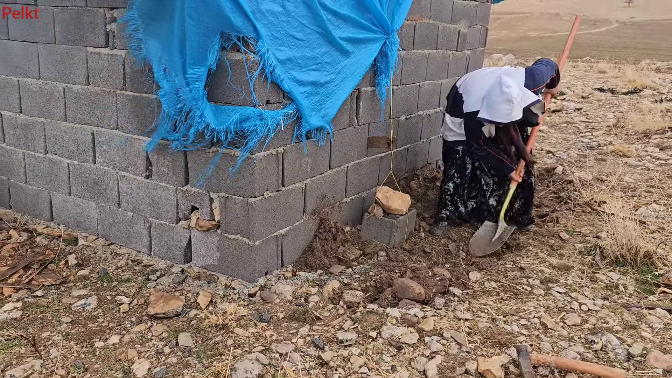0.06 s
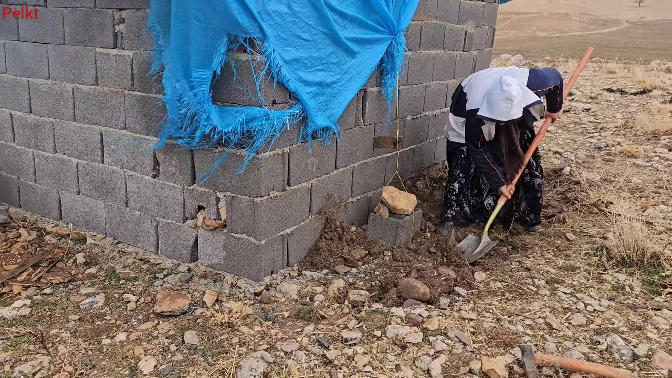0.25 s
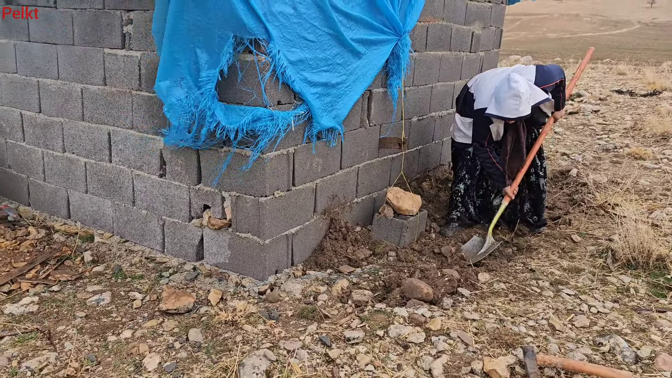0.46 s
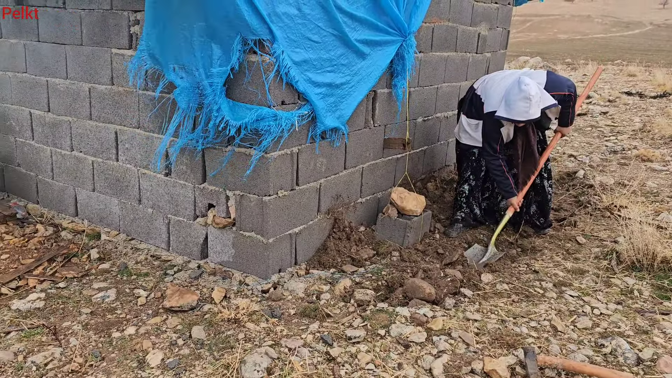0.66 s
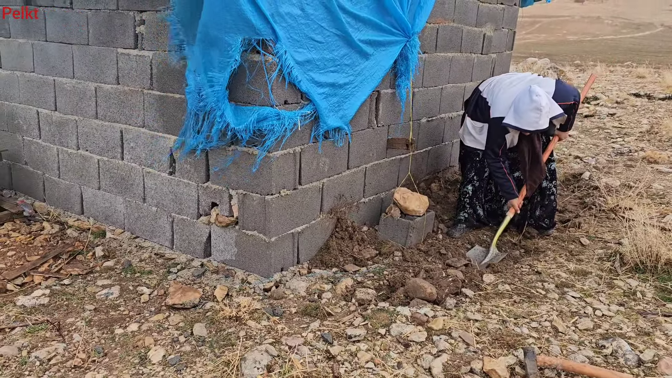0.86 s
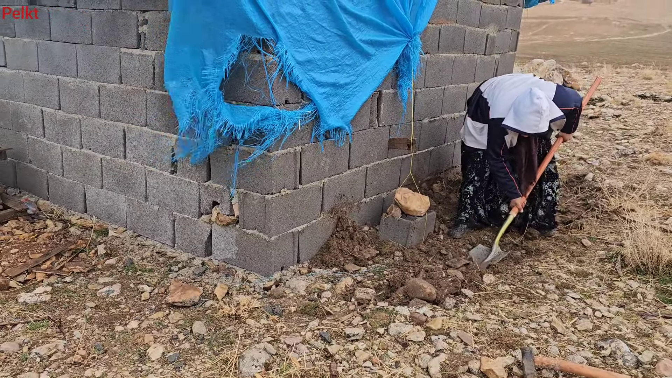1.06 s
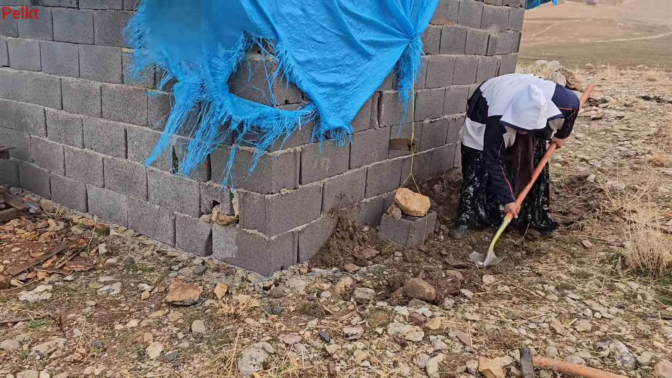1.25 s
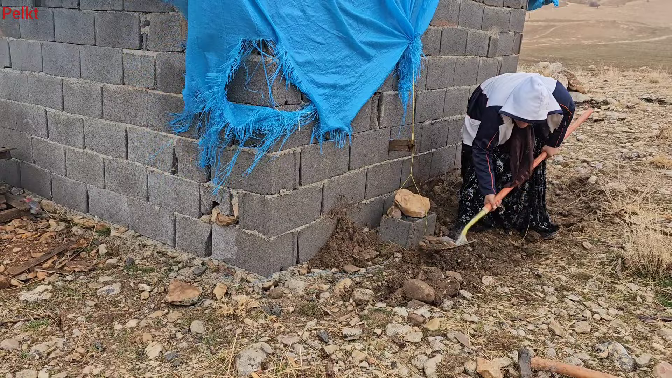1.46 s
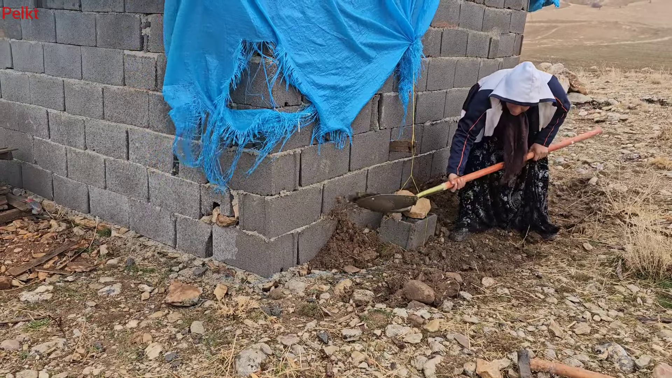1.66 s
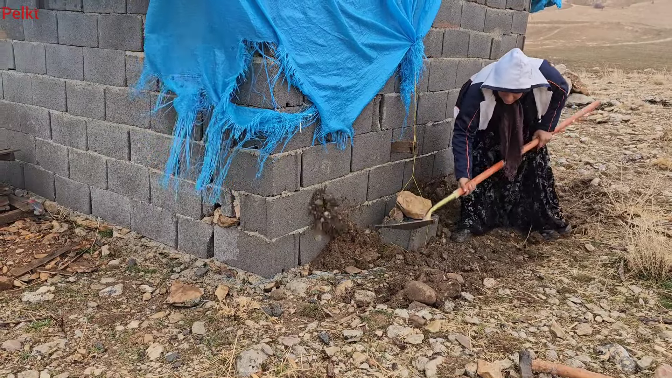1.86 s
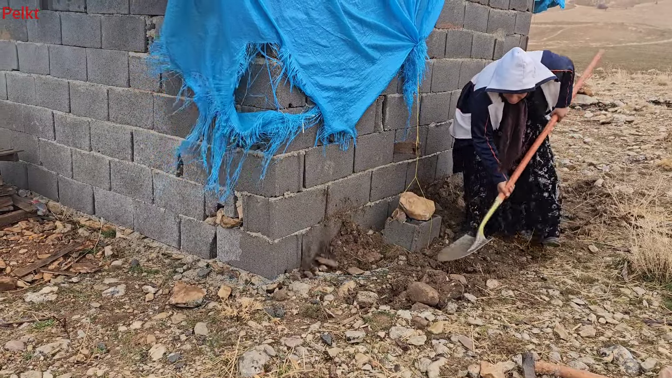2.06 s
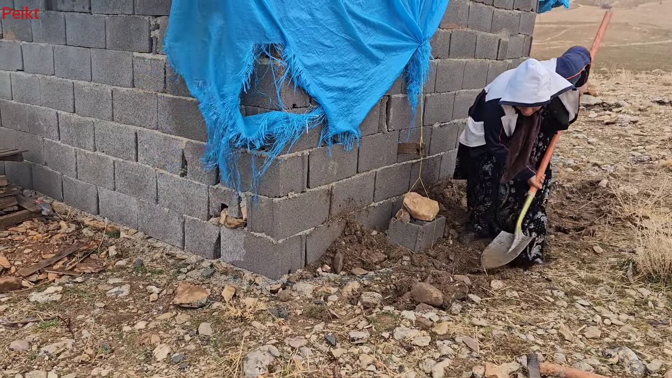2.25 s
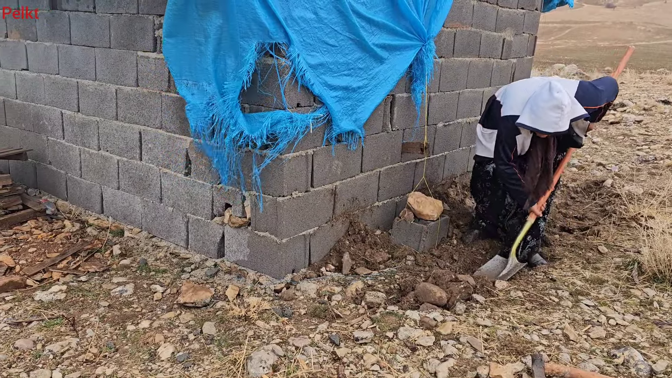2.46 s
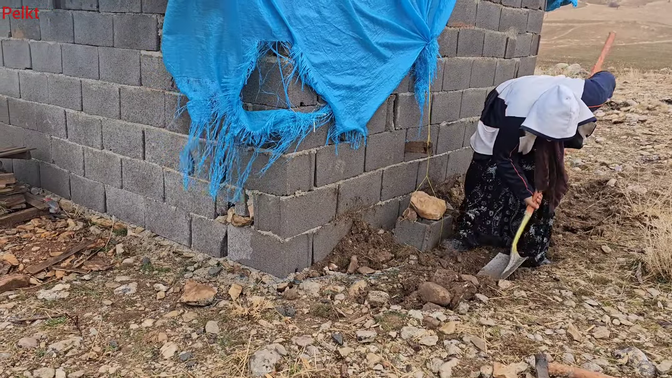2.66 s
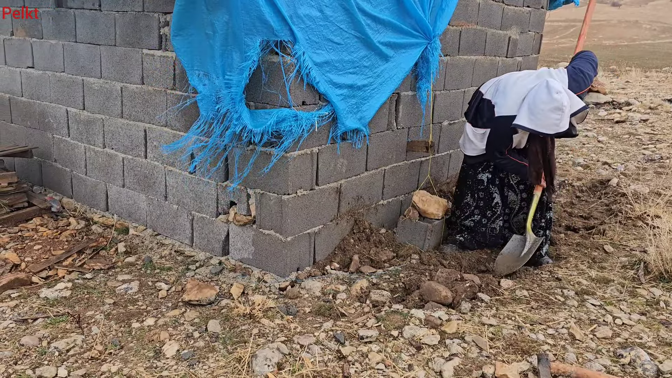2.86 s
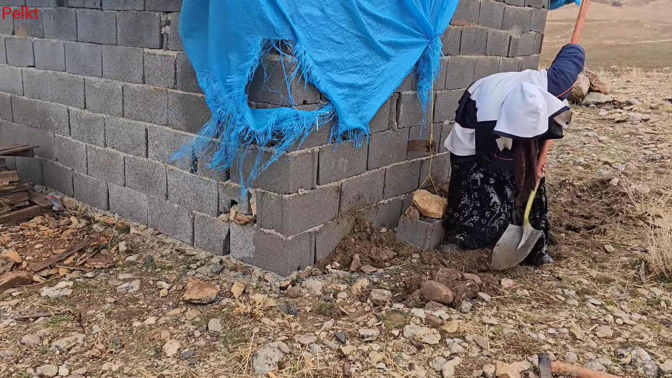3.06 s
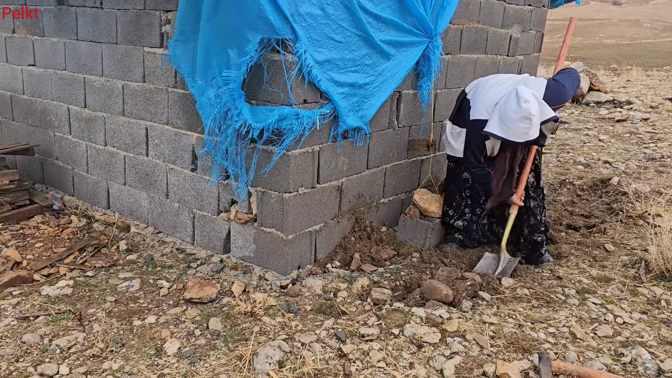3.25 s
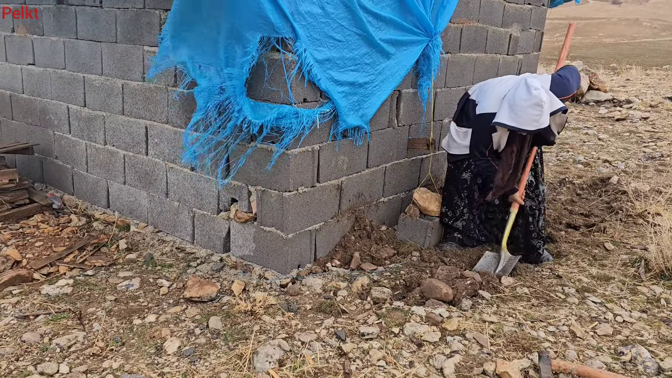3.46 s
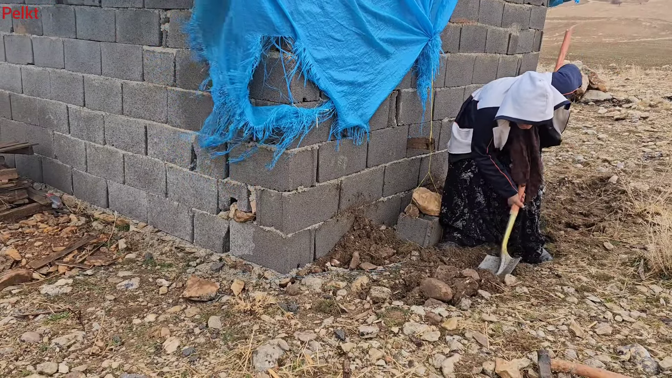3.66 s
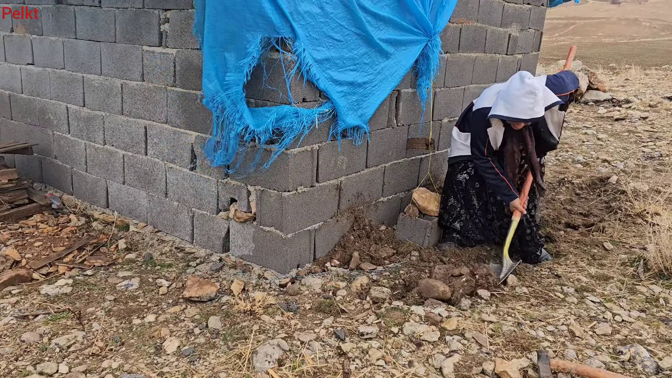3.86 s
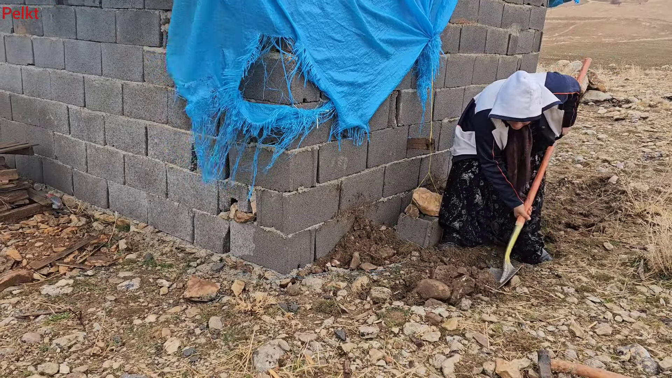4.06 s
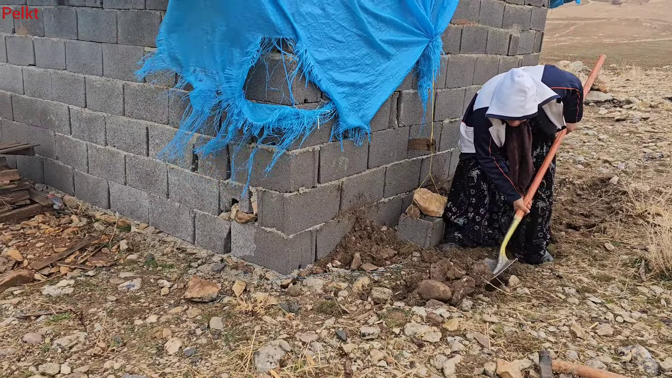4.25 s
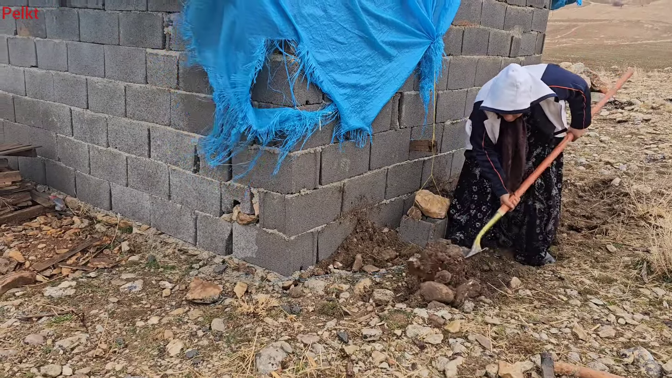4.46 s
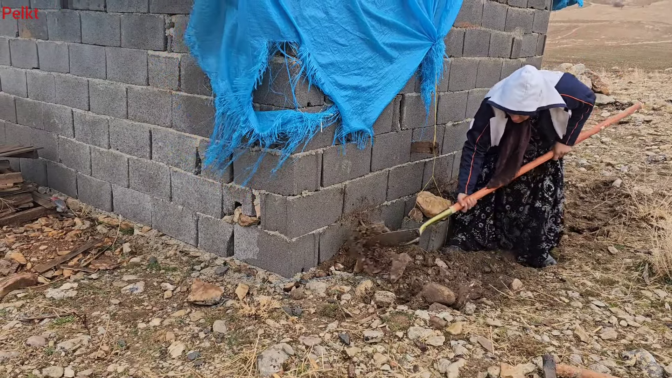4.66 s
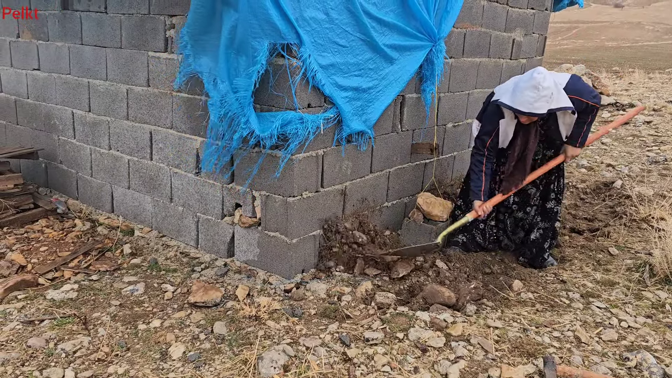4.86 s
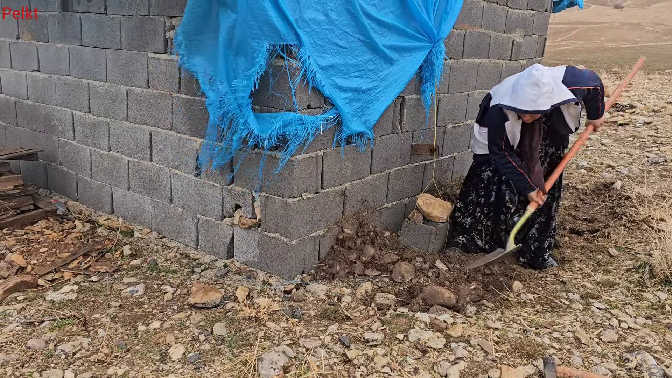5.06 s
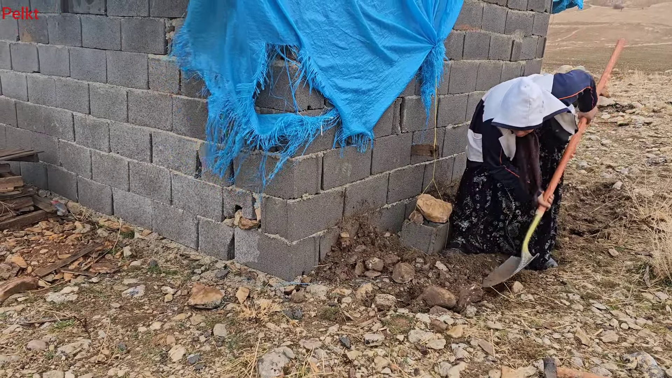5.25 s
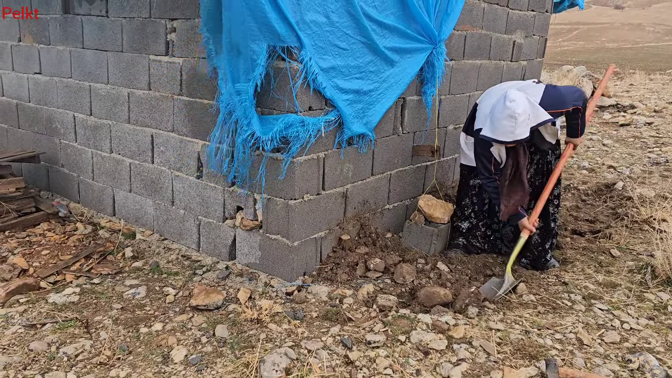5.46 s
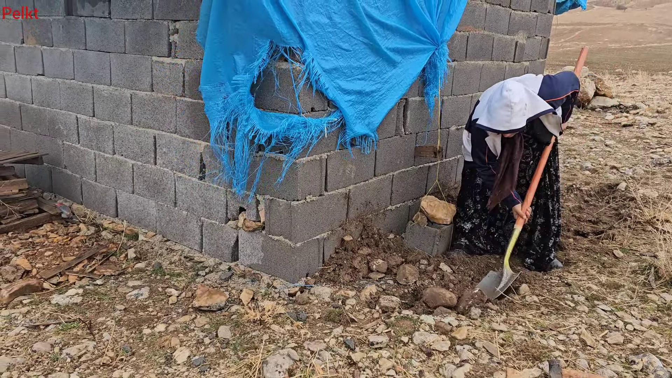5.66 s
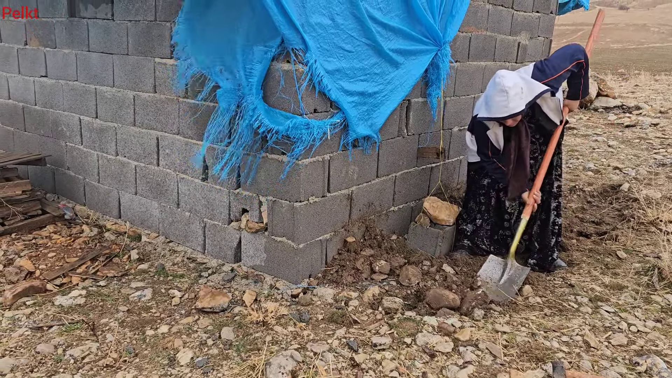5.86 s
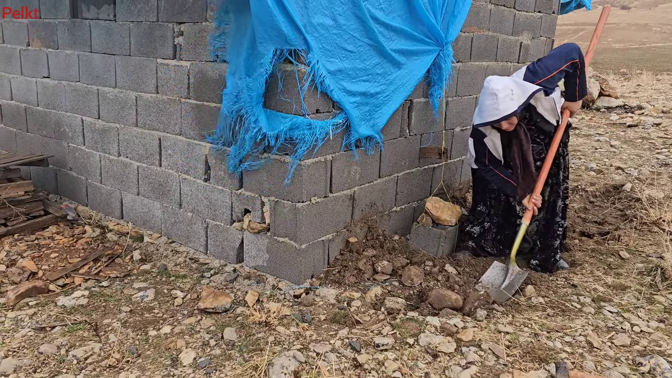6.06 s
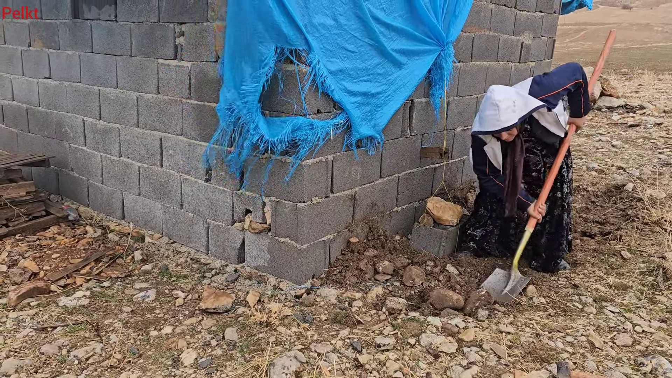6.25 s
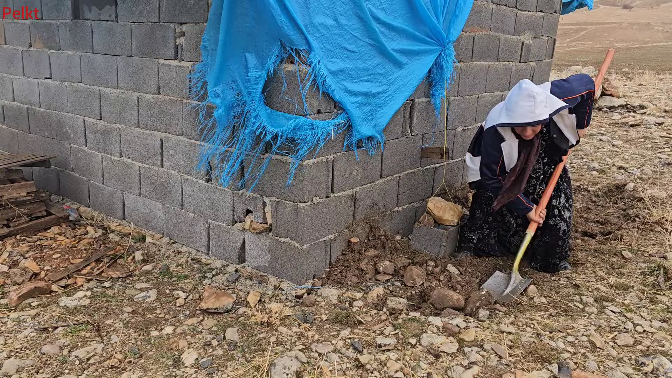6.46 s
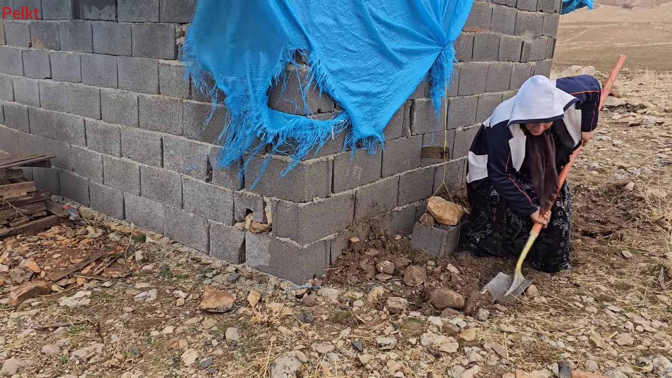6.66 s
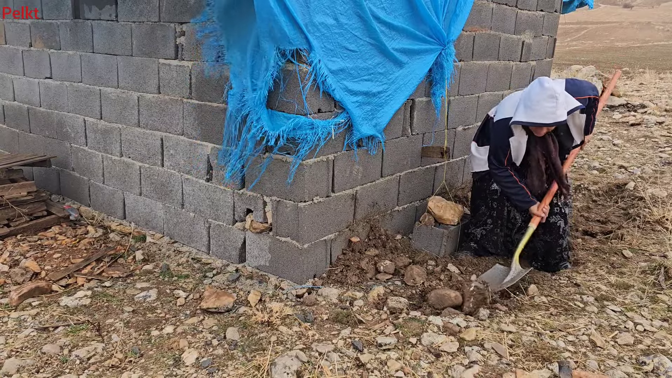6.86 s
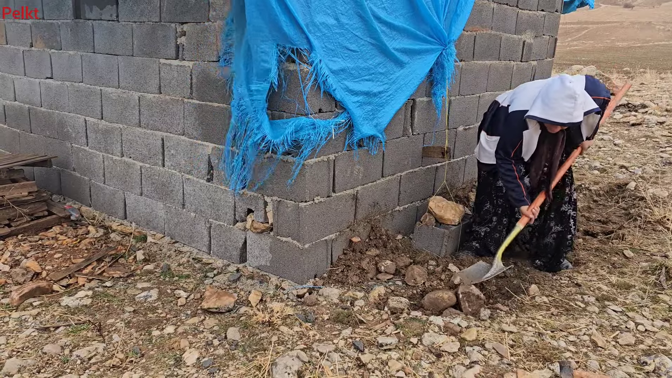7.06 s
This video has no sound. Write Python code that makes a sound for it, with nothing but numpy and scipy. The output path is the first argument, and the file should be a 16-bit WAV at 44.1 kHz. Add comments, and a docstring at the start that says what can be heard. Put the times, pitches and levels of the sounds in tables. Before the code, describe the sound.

Outdoors in a light breeze, a shovel blade crunches into gravelly dirt, grates under stones, and tosses loose soil with clattering pebbles.

```python
"""Light wind rumbles on two microphone ports over a faint outdoor hiss, a short clack, then a steel shovel digs in.
A few metres away, beside a block wall, the blade is stabbed into stony soil five times and worked under the stones.
Contacts are showers of random fractures plus decaying modes of shaft and blade; scrapes, squeals and falling
soil are swelling streams of grains; stones, and part of some blade blows, are short coloured bursts.
Wind and hiss are shaped noise. Ground and wall answer with diffuse returns."""
import sys
import numpy as np
from scipy import signal
from scipy.fft import rfft, irfft
from scipy.io import wavfile
from scipy.ndimage import uniform_filter1d

SR = 44100
rng = np.random.default_rng(int(sys.argv[2]) if len(sys.argv) > 2 else 0)


def master(y):
    """Save y as 16-bit WAV."""
    cut = np.clip(np.atleast_2d(y).T, -1, 1)
    pcm = np.round(cut * 32767)  # scale
    wavfile.write(sys.argv[1], SR, pcm.astype(np.int16))


N = 313110
TIME = np.arange(N) / SR  # the whole scene [s]
AGE = np.arange(SR // 2) / SR  # time since one sound began [s]
BINS = np.fft.rfftfreq(4096, 1 / SR)  # frequencies of every colour [Hz]

# the blade slides through grit: (start [s], peak [s], end [s], level [dB], tilt [dB per octave])
SCRAPES = [(0.172, 0.189, 0.28, -32, 1), (0.199, 0.25, 0.42, -48.5, -0.5), (0.549, 0.66, 0.75, -47.5, 0),
           (1.131, 1.23, 1.35, -42, -1.5), (1.298, 1.365, 1.417, -38, -1.5),
           (2.394, 2.437, 2.71, -55.5, -2.5), (3.44, 3.615, 3.84, -48.5, -3),
           (3.762, 3.822, 3.876, -42, -1), (3.87, 3.89, 3.995, -42.5, -1), (4.235, 4.31, 4.45, -42.5, -1),
           (4.339, 4.411, 4.465, -44, -2.5), (5.079, 5.237, 5.33, -55, 5.5), (5.648, 5.714, 5.8, -48.5, -1),
           (5.779, 5.82, 6.2, -47.5, 0.5), (6.101, 6.13, 6.25, -44.5, 1.5), (6.401, 6.517, 6.7, -58.5, -1),
           (6.744, 6.82, 7.3, -50, -5)]
# loose soil is thrown on the heap: (start [s], peak [s], end [s], level [dB])
SPILLS = [(1.75, 1.81, 2.06, -54), (1.969, 2.06, 2.26, -50.5), (4.66, 4.804, 4.9, -49.5),
          (4.88, 4.986, 5.23, -63)]
# modes of the steel blade: (frequency [Hz], t60 when free [s], struck at the tip [dB], struck on the side [dB])
BLADE = [(1050, 0.14, -20, -9), (1155, 0.042, -1, -28.5), (1427, 0.078, -3.5, -0.5),
         (1476, 0.2, -7.5, -9.5), (1639, 0.14, 0, -23.5), (1850, 0.13, -4.5, -18.5), (2005, 0.23, 5, -30.5),
         (2050, 0.15, -26.5, 5.5), (2285, 0.22, -12, -4), (2483, 0.22, -4.5, -25.5), (2970, 0.09, -4.5, 7),
         (3050, 0.059, -2.5, -14.5), (3350, 0.066, -3, -9), (3300, 0.059, -15, 4),
         (3500, .08, -18.5, -18.5), (4590, 0.063, -20, -2.5)]


def amp(db):
    """Decibels to gain."""
    return 10 ** (np.asarray(db) / 20)


def unit(x):
    """Scales to rms 1."""
    return x / np.sqrt(np.mean(x ** 2) + 1e-20)


def read(points, hz):
    """A spectrum joined by straight lines over log frequency."""
    f, value = np.transpose(points)
    return np.interp(np.log(hz + 1), np.log(f + 1), value)


def follow(points, t):
    """A control curve at the times t."""
    return np.interp(t, *np.transpose(points))


def add(mix, s, sound):
    """Mixes a sound in at s seconds."""
    part = mix[max(round(s * SR), 0):][:len(sound)]
    part += sound[:len(part)]


def dying(t60):
    """An exponential decay by 60 dB in t60 seconds."""
    return 10 ** (-3 * AGE / max(t60, 1e-3))


def onset(rise_s):
    """A smooth start: contact through soil takes a moment to build."""
    return 1 - np.exp(-(AGE / rise_s) ** 2)


def colour(x, db):
    """Filters causally, with minimum phase, by a gain given at BINS."""
    cepstrum = irfft(np.log(amp(db)))
    # folding the cepstrum forward in time makes the filter causal
    cepstrum[1:2048] *= 2
    cepstrum[2049:] = 0
    response = irfft(np.exp(rfft(cepstrum)))
    return signal.fftconvolve(x, response)[:len(x)]


def ripple(width_bins):
    """Random peaks and dips of rms 1 over BINS: every stone and every grip on the blade rings differently."""
    smooth = uniform_filter1d(rng.standard_normal(len(BINS)), width_bins)
    return unit(uniform_filter1d(smooth, width_bins))


def grains(size, per_s, spread_db):
    """Tiny random fractures, most small and a few large."""
    chance, height, sign = rng.random((3, size))
    height = np.minimum(-np.log(1 - height), 4)
    happens = chance < per_s / SR
    return unit(happens * np.sign(sign - .5) * amp(spread_db * height))


def burst(db, t60, rise_s, per_s, spread_db):
    """A dying shower of fractures with the colour db, with the energy of a decay that starts at rms 1."""
    shower = grains(len(AGE), per_s, spread_db) * dying(t60) * onset(rise_s)
    sound = colour(shower, db)
    return sound * np.linalg.norm(dying(t60)) / np.linalg.norm(sound)


def stroke(start, peak, end, db, per_s, spread_db, clump_db):
    """A stream of grains with the colour db that swells to rms 1 and ebbs, sticking and slipping in clumps."""
    shape = np.interp(start + AGE, [start, peak, end], [0, 1, 0])
    clumps = np.interp(AGE, np.linspace(0, AGE[-1], 64), rng.standard_normal(64))
    stream = grains(len(AGE), per_s, spread_db) * amp(clump_db * clumps)
    return unit(colour(stream, db)) * shape


def noise_pair(db, likeness):
    """Two partly alike noises, scaled together to rms 1, with the colour db at BINS."""
    hz = np.fft.rfftfreq(N, 1 / SR)
    left, other = rfft(rng.standard_normal((2, N)))
    same = np.clip(np.interp(hz, BINS, likeness), -1, 1)
    right = same * left + np.sqrt(1 - same ** 2) * other
    gain = amp(np.interp(hz, BINS, db))
    return unit(irfft(np.array([left, right]) * gain, N))


def flutter(smooth_s):
    """Random wavering of rms 1, slower as smooth_s grows."""
    hz = np.fft.rfftfreq(N, 1 / SR)
    slow = rfft(rng.standard_normal(N)) * np.exp(-(hz * smooth_s) ** 2)
    return unit(irfft(slow, N))


def wind():
    """Eddies buffet the ports; gusts reach higher in pitch and break into puffs. Behind them the open air hisses."""
    # wind on the microphone, a long gust and then a fitful breeze: (time [s], level [dB])
    wind_level = [(0, -43), (0.42, -43.5), (0.55, -39.5), (0.72, -47), (1.05, -45.5), (1.2, -39.5),
                  (1.5, -39), (1.57, -50.5), (2.0, -47.5), (2.8, -47.5), (3.12, -46.5), (3.7, -52.5),
                  (4.12, -45), (4.42, -51.5), (5.7, -52.5), (6.1, -44.5), (6.3, -52), (7.1, -47.5)]
    # level of the outdoor hiss: (time [s], level [dB])
    hiss_level = [(0, -60), (1.4, -57), (2.3, -62.5), (3.0, -63.5), (3.6, -59.5), (4.15, -58.5),
                  (4.7, -62.5), (5.55, -63), (7.1, -59.5)]
    # colour of a gust before its treble is cut further: (frequency [Hz], density [dB per Hz])
    gust_colour = [(12, -69), (20, -32), (40, -20), (117, 0), (166, -3), (208, 3.5), (286, -4.5),
                   (341, -12.5), (507, -17.5), (900, -34), (1170, -65), (1980, -120)]
    # colour of a breeze: (frequency [Hz], density [dB per Hz])
    breeze_colour = [(20, -28.5), (35, -24), (55, -7), (90, 0.5), (170, -2.5), (240, -8), (330, -19.5),
                     (500, -19), (900, -54.5), (2000, -68)]
    # colour of the outdoor hiss: (frequency [Hz], density [dB per Hz])
    air_colour = [(100, -6.5), (500, 1), (1000, 0), (1900, 2), (2700, -4.5), (4200, -7.5), (6000, -15),
                  (9000, -24.5), (12000, -35), (16000, -44.5)]
    # how alike the wind is at the two ports: (frequency [Hz], left-right likeness [0-1])
    wind_likeness = [(30, 0.43), (70, 1), (130, 0.54), (300, 0.51), (1000, 0.16)]
    calm_db, gust_db, sustain_s = -49, -43, 0.87  # sustained level: all breeze, all gust; averaging time
    eddy_db, eddy_s = 3.8, 0.028
    puff_db, puff_spread_db = -20.5, 7  # re the wind level; unevenness

    likeness = read(wind_likeness, BINS)
    level_db = follow(wind_level, TIME)
    sustained_db = uniform_filter1d(level_db, round(sustain_s * SR))
    share = np.clip((sustained_db - calm_db) / (gust_db - calm_db), 0, 1)  # 0 breeze - 1 gust
    treble_cut_db = 18 * np.log2(np.maximum(BINS / 700, 1))
    gust = noise_pair(read(gust_colour, BINS) - treble_cut_db, likeness)
    breeze = noise_pair(read(breeze_colour, BINS), likeness)
    blend = np.sqrt(share) * gust + np.sqrt(1 - share) * breeze
    rumble = blend * amp(level_db + eddy_db * flutter(eddy_s))

    puffs = noise_pair(read([(150, -23), (330, -0.5), (520, -7.5), (900, -16), (2000, -52)], BINS), likeness)
    puffs = puffs * share * amp(level_db + puff_db + puff_spread_db * np.minimum(flutter(0.026), 2))

    hiss_db = follow(hiss_level, TIME) + 0.74 * flutter(0.015)
    hiss = noise_pair(read(air_colour, BINS), likeness * .5) * amp(hiss_db)
    return rumble + puffs + hiss


def clack(hz, t60):
    """A short dry clack with a bright snap, around a main resonance at hz."""
    below, above = (BINS + 1) / hz, (BINS + 1) / (1.35 * hz)
    hump = -10 * np.log10((1 + (.45 / below) ** 5) * (1 + above ** 3.6) * (1 + (BINS / 11000) ** 10))
    resonance = 10 * np.log10(1 + 3 / (1 + ((below - 1) / 0.24) ** 2))
    tone = hump + resonance + 2 * ripple(width_bins=16)
    return burst(tone, t60, rise_s=0.00021, per_s=9000, spread_db=1)


def clacks():
    """Short coloured clacks: stones, and the knocking part of some blade blows."""
    # (time [s], level [dB], centre [Hz], t60 [s])
    clack_list = [(0.014, -23.5, 2140, 0.014), (0.098, -28, 3400, 0.0065), (0.565, -41, 1810, 0.025),
                  (0.918, -33.5, 1520, 0.05), (1.228, -35, 686, 0.11), (1.323, -32, 1190, 0.07),
                  (1.78, -25.5, 1850, 0.025), (1.822, -22.5, 1130, 0.04), (1.856, -36.5, 1720, 0.064),
                  (1.986, -41, 4400, 0.015), (2.009, -32.5, 2340, 0.015), (2.047, -37, 4330, 0.023),
                  (2.116, -36.5, 4100, 0.015), (2.127, -39.5, 2430, 0.042), (2.199, -37.5, 1450, 0.024),
                  (2.391, -19, 1280, 0.073), (2.746, -45, 1880, 0.073), (3.823, -34, 3120, 0.037),
                  (3.94, -23, 760, 0.032), (4.313, -37.5, 1700, 0.048), (4.442, -41.5, 2600, 0.029),
                  (4.484, -36.5, 2200, 0.045), (4.498, -39, 1670, 0.06), (4.631, -43.5, 1490, 0.036),
                  (4.667, -38.5, 3460, 0.032), (4.777, -26.5, 1500, 0.03), (4.807, -43, 3750, 0.033),
                  (5.016, -47.5, 3470, 0.02), (5.22, -40, 2240, 0.023), (5.373, -16, 2600, 0.064)]
    out = np.zeros(N)
    for s, db, hz, t60 in clack_list:
        add(out, s, amp(db) * clack(hz, t60))
    return out


def blade_colour(tilt, width_hz, lift_db):
    """Grit heard through the blade, whose modes the soil damps to broad peaks."""
    # steel on grit, before the blade's resonances and the tilt: (frequency [Hz], density [dB per Hz])
    grit = [(100, -32.5), (280, -12.5), (420, 4), (620, -1), (850, -1), (1500, -2), (2400, -3.5),
            (4000, -2), (6000, -12.5), (9500, -30), (12500, -36), (16000, -54.5)]
    peaks = sum(amp(tip + lift_db) ** 2 / (1 + (2 * (BINS - hz) / width_hz) ** 2) for hz, _, tip, _ in BLADE)
    tilt_db = tilt * np.log2(np.clip(BINS, 600, 9000) / 2000)
    return read(grit, BINS) + 10 * np.log10(1 + peaks) + tilt_db


def contact(crunch_db, t60, tilt, thud_db, ring_db, place, freedom):
    """One contact crushes grit, thuds through the shaft and rings the blade until the soil grips it."""
    # modes of the whole shovel on its wooden shaft: (frequency [Hz], t60 [s], level [dB])
    shaft = [(404, 0.073, -10.5), (463.5, 0.048, 4), (525, 0.016, -23.5), (790, 0.014, -17.5)]
    thud = sum(amp(db) * dying(life) * np.sin(2 * np.pi * hz * AGE) for hz, life, db in shaft) * onset(0.002)
    # a narrow shaft radiates little bass
    thud = colour(thud, read([(100, -26.5), (290, -20.5), (380, 3), (900, -3.0), (2000, -11.5)], BINS))

    crunch_tone = blade_colour(tilt, width_hz=90, lift_db=8.0)
    crunch = burst(crunch_tone, t60, rise_s=0.0021, per_s=14000, spread_db=3.0)

    place = np.clip(place, 0, 1)
    ring = np.zeros(len(AGE))
    for hz, life, tip, side in BLADE:
        mode = np.sin(2 * np.pi * (hz * AGE + rng.random()))
        ring += amp(tip + place * (side - tip)) * dying(life * freedom) * mode
    ring *= onset(0.0014)
    return amp(crunch_db) * (crunch + amp(thud_db) * thud + amp(ring_db) * ring)


def stabs():
    """Each stab swells in briefly, touches, bites, and settles with a duller second crunch."""
    # the blade is stabbed in; thud and ring are re the crunch, touch and settling re the bite:
    # (time of the bite [s], crunch [dB], tilt [dB per octave], shaft thud [dB], blade ring [dB],
    #  place on the blade [0 tip - 1 side], freedom to ring [0-1], touch lead [s], touch [dB],
    #  settling delay [s], settling [dB])
    thrusts = [(0.15, -16.5, 5.5, -34, -30, 0.12, 0.25, 0.011, -8, 0.028, -11),
               (2.388, -18.5, 1, -29, -7, 0.2, 0.25, 0.008, -31, 0.023, -12),
               (3.193, -17, 3.5, -32, -4, 0.01, 0.2, 0.009, -6, 0.016, -4.5),
               (5.3695, -8.5, 2, -17, -4, 0.018, 0.2, 0.004, -24, 0.012, -5.5),
               (6.806, -13.5, 1, 5.5, -4.5, 0, 0.8, 0.014, -8, 0.0045, -10.5)]
    bite_t60_s, touch_t60_s, settle_t60_s = 0.071, 0.065, 0.071
    touch_thud_db, settle_thud_db = -19, -0.5  # added: the light touch hardly moves the shaft; the stop jolts it
    settle_tilt, settle_freedom = -2.5, 0.66  # deeper soil: added dB per octave; share of the ring time left
    out = np.zeros(N)
    for s, db, tilt, thud_db, ring_db, place, freedom, lead_s, touch_db, delay_s, settle_db in thrusts:
        swell_in = burst(blade_colour(tilt, width_hz=100, lift_db=6), 0.03, rise_s=0.00039, per_s=7900, spread_db=3)
        swell_in = swell_in[:SR // 32][::-1]  # reversed, so that it grows up to the bite
        add(out, s - len(swell_in) / SR, amp(db - 19) * swell_in)

        touch = contact(db + touch_db, touch_t60_s, tilt, thud_db + touch_thud_db, ring_db - 6, place, freedom)
        add(out, s - lead_s, touch)
        add(out, s, contact(db, bite_t60_s, tilt, thud_db, ring_db, place, freedom))
        settling = contact(db + settle_db, settle_t60_s, tilt + settle_tilt, thud_db + settle_thud_db,
                           ring_db - 3, place, freedom * settle_freedom)
        add(out, s + delay_s, settling)
    return out


def scrapes():
    """Grit slips along the steel and keeps the blade faintly singing."""
    out = np.zeros(N)
    for start, peak, end, db, tilt in SCRAPES:
        tone = blade_colour(tilt, width_hz=42, lift_db=4) + 3 * ripple(width_bins=8)
        slide = stroke(start, peak, end, tone, per_s=2200, spread_db=5, clump_db=4.5)
        add(out, start, amp(db) * slide)
    return out


def patter(start, peak, end, db, per_s, hz, t60):
    """Small stones of random size and strength, loudest around the peak of a stroke."""
    out = np.zeros(N)
    draws = rng.random((24, 3))[:round(per_s * (end - start))]  # at most 24 stones
    for k, (when, strength, size) in enumerate(draws):
        s = start + (end - start) * (k + when) / len(draws)
        swell = np.sqrt(np.interp(s, [start, peak, end], [0, 1, 0]))
        stone = clack(hz * 2 ** (.5 - size), t60)
        add(out, s, swell * amp(db + 8.9 * (strength - 1.0)) * stone)
    return out


def pebbles():
    """Gravel snaps aside ahead of the sliding blade, and pebbles land all through each spill."""
    hard_scrape_db = -44  # only scrapes above this level dislodge gravel
    gravel_db, pebble_db = 1, 1.5  # strongest stones, re their scrape or spill
    snapping = sum(patter(start, peak, end, db + gravel_db, per_s=40, hz=1600, t60=0.014)
                   for start, peak, end, db, _ in SCRAPES if db > hard_scrape_db)
    landing = sum(patter(start, peak, end, db + pebble_db, per_s=25, hz=3520, t60=0.014)
                  for start, peak, end, db in SPILLS)
    return snapping + landing


def squeals():
    """A stone caught under the edge: fast slips on steel feed a few narrow resonances."""
    # the steel squeals; a row whose end lies before its start stays silent:
    # (start [s], peak [s], end [s], level [dB])
    slips = [(1.149, 1.193, 1.26, -47.5), (1.331, 1.36, 1.445, -61), (5.789, 5.825, 5.94, -42),
             (6.112, 6.152, 5.94, -43)]
    # the squeal's resonances: (frequency [Hz], width [Hz], level [dB])
    squeal_modes = [(2070, 87, 2), (2240, 89, -1), (2960, 74, 4), (3270, 90, 3), (4130, 120, -6),
                    (4660, 420, -8)]
    out = np.zeros(N)
    power = sum(amp(db) ** 2 / (1 + ((BINS - hz) / width) ** 2) ** 2 for hz, width, db in squeal_modes)
    tone = 10 * np.log10(power)
    for start, peak, end, db in slips:
        squeal = stroke(start, peak, end, tone, per_s=6000, spread_db=1.5, clump_db=1.5)
        add(out, start, amp(db) * squeal)
    return out


def knocks():
    """Single contacts of the shovel: knocks while it is worked, a jolt after a stab, a ring of the freed blade."""
    # (time [s], crunch [dB], shaft thud re crunch [dB], blade ring re crunch [dB],
    #  place on the blade [0 tip - 1 side], freedom to ring [0-1])
    hits = [(1.221, -30, -21, -15, 0.6, 0.4), (1.303, -29, -37, -19, 0.4, 0.2),
            (3.607, -34, -18, -11, 0, 0.6), (3.888, -34, -18, -25, 0.2, 0.3), (3.939, -26, 2, -10, 0, 0.28),
            (5.402, -26, 0.5, -17, 0.2, 0.3), (5.917, -36, -34, 4.5, 0.34, 0.54),
            (6.005, -35, -11, -11, 0.2, 1), (6.495, -38.5, 0.5, -20, 0.4, 0.2),
            (6.635, -57.5, 23.5, -11, 0, 0.36), (7.05, -36.5, -28.5, -3.5, 0.94, 1)]
    knock_t60_s, knock_tilt = 0.064, 0.23  # tilt in dB per octave
    out = np.zeros(N)
    for s, db, thud_db, ring_db, place, freedom in hits:
        add(out, s, contact(db, knock_t60_s, knock_tilt, thud_db, ring_db, place, freedom))
    return out


def spills():
    """Crumbs of soil patter on the ground, sparse and bright."""
    out = np.zeros(N)
    tone = read([(150, -7.5), (600, 5.5), (2000, 0.5), (5000, -4.0), (9000, -19), (15000, -48)], BINS)
    for start, peak, end, db in SPILLS:
        crumbs = stroke(start, peak, end, tone, per_s=1300, spread_db=4.8, clump_db=3)
        add(out, start, amp(db) * crumbs)
    return out


def ports(x, lag_ms):
    """Sound from the right reaches the left port late (positive lag); that port is a little brighter."""
    hz = np.fft.rfftfreq(N, 1 / SR)
    difference_db = read([(500, -0.4), (1200, -0.1), (2200, 2.5), (4500, 6.0), (8000, 1.5), (12000, -0.5)], hz)
    lean_db = difference_db / 2
    z = rfft(x)
    left = z * amp(lean_db) * np.exp(-2j * np.pi * hz * lag_ms / 10 ** 3)
    right = z * amp(-lean_db)
    return irfft(np.array([left, right]), N)


def scatter(x, t60, delay_s):
    """Diffuse returns from rough ground and wall, different at each port."""
    taps = rng.standard_normal((2, len(AGE))) * dying(t60) * onset(delay_s)
    return signal.fftconvolve(x[None], taps / np.linalg.norm(taps[0]), axes=1)[:, :N]


def scene():
    """The hole to the right, the heap near the middle, their reflections and the wind."""
    air = wind()
    debris = clacks() + pebbles() + spills()
    shovel = stabs() + scrapes() + squeals() + knocks()
    # during a spill, clacks, pebbles and crumbs come from the heap
    heap = np.any([(TIME > start) & (TIME < end) for start, _, end, _ in SPILLS], axis=0)
    direct = ports(shovel + ~heap * debris, lag_ms=.107) + ports(heap * debris, lag_ms=-.035)
    near = amp(-10) * scatter(shovel + debris, t60=.04, delay_s=.002)
    far = amp(-32) * scatter(shovel + debris, t60=0.2, delay_s=0.0099)
    return direct + near + far + air


def record(dry):
    """The hardest peaks are rounded off; then the recorder's band limit."""
    ceiling, edge_hz = 0.92, 15700  # the rounding's largest amplitude; upper band edge
    rounded = dry / (1 + (dry / ceiling) ** 6) ** (1 / 6)
    lowpass = signal.firwin(511, edge_hz, window=("kaiser", 9), fs=SR)
    return signal.oaconvolve(rounded, lowpass[None], "same")


dry = scene()
out = record(dry)
master(out)
```